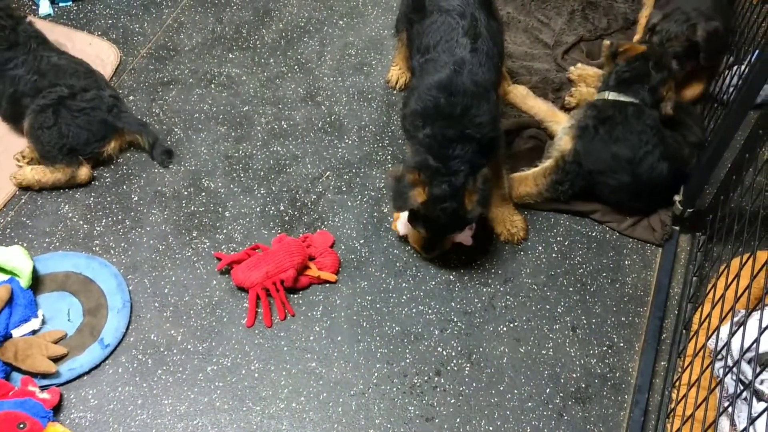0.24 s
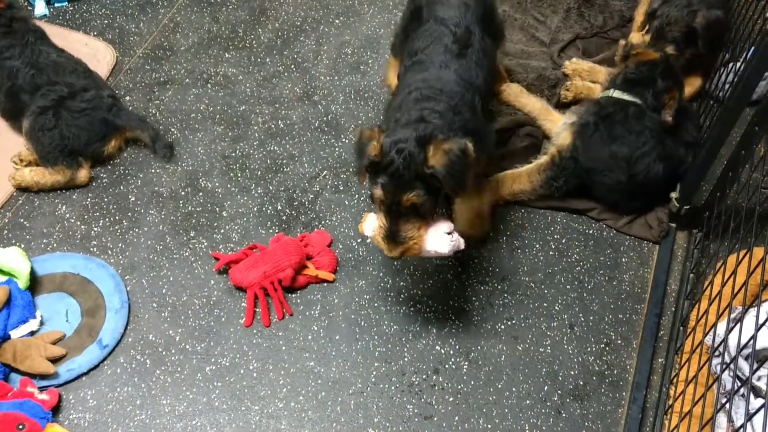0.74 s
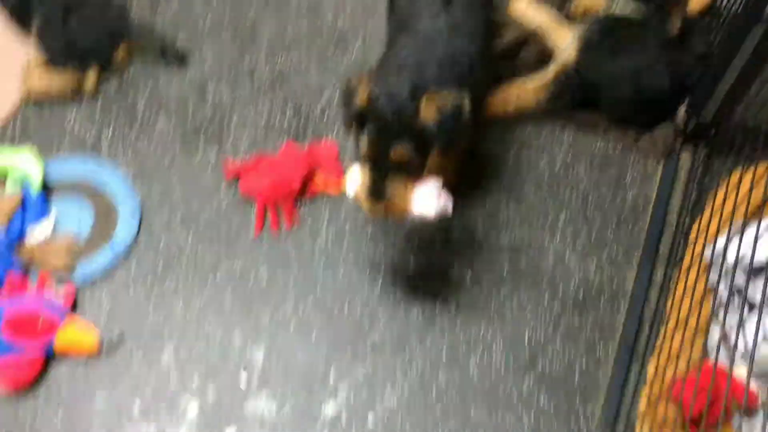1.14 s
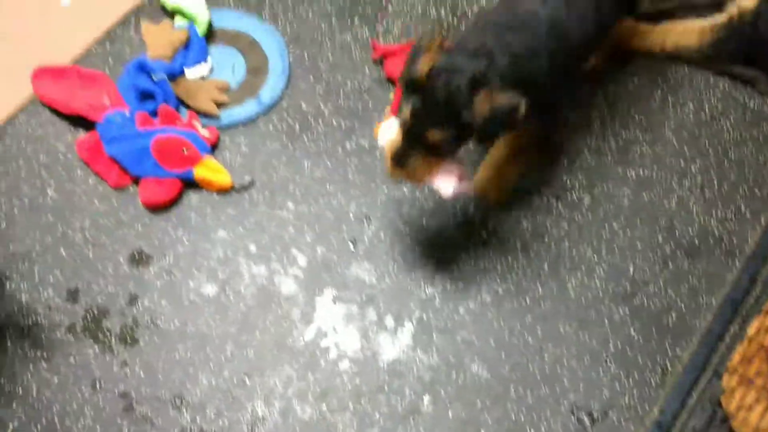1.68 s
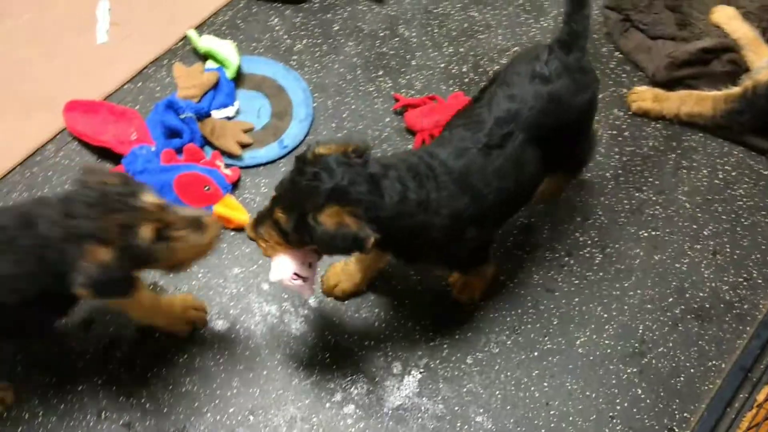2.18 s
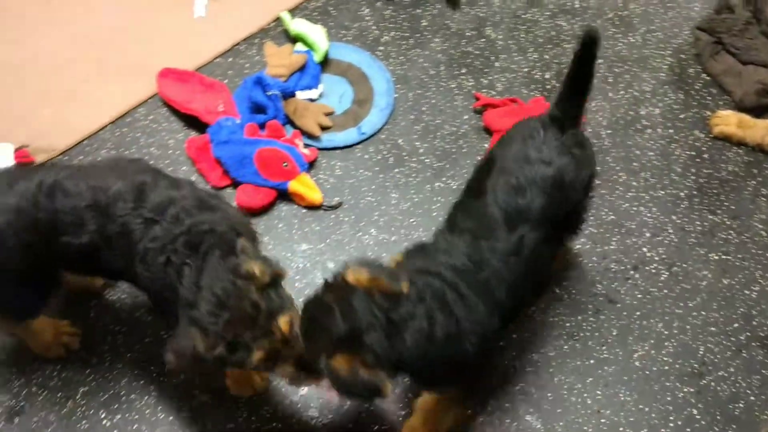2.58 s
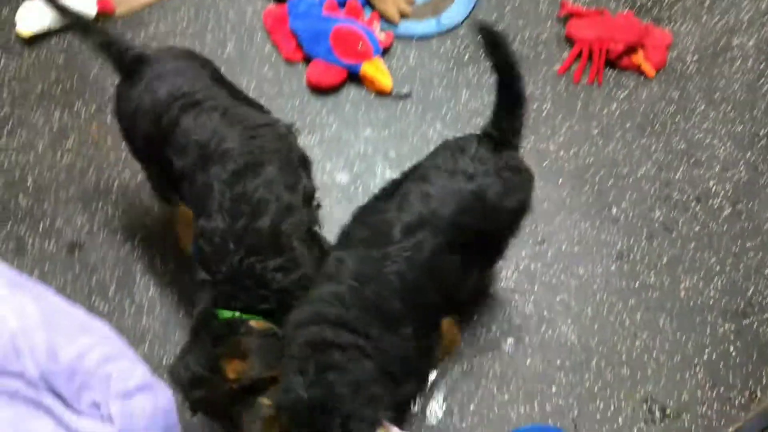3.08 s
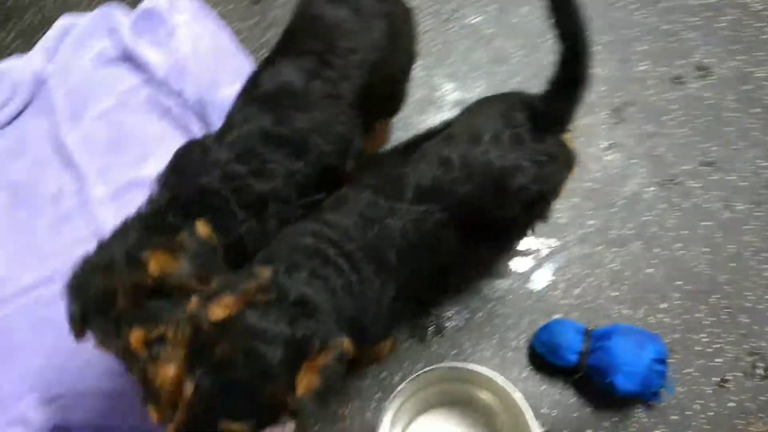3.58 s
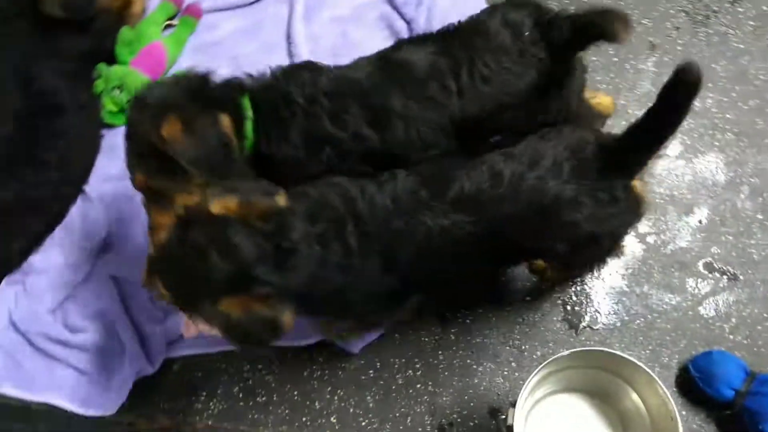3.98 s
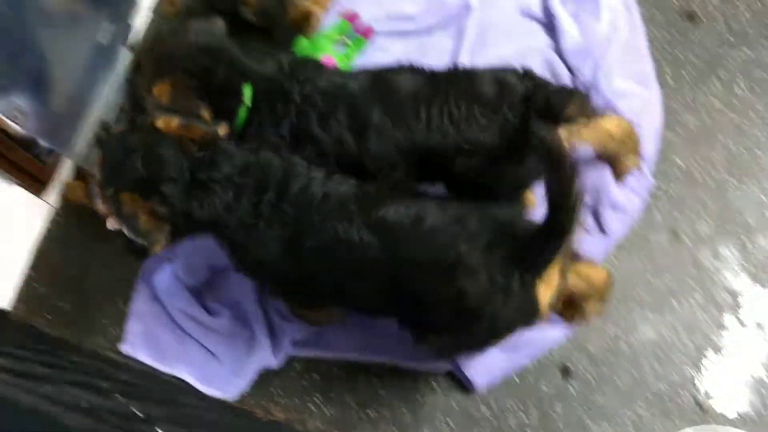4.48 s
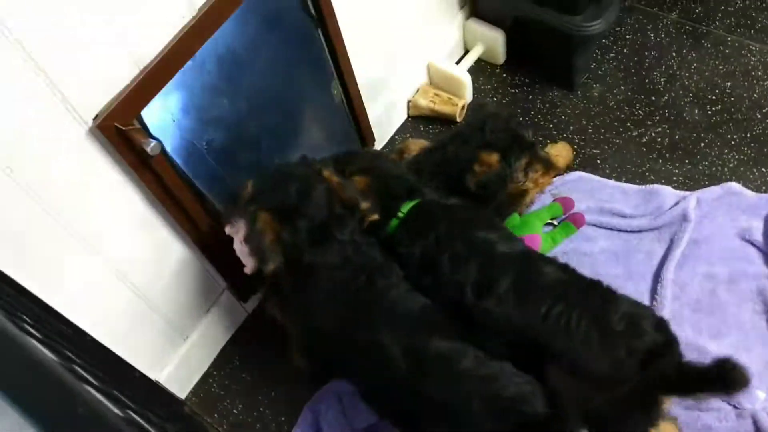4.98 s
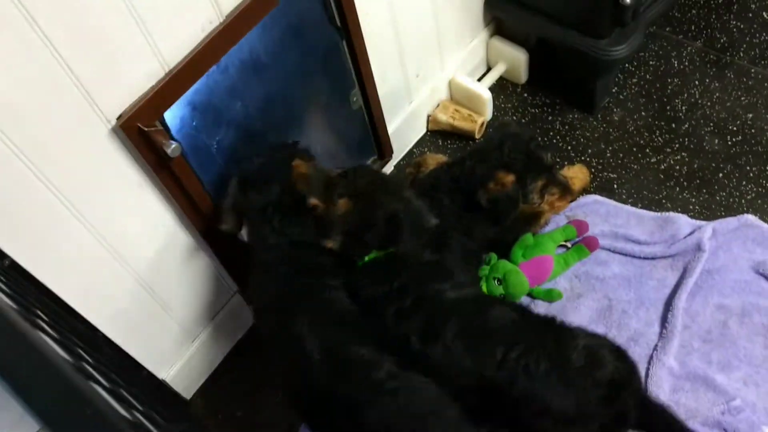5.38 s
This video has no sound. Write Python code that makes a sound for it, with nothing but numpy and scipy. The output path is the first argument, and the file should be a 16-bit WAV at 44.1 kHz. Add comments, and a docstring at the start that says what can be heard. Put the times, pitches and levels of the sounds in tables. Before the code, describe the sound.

In a small, quiet room with low ventilation hum, puppies' paws pad and slide over rubber flooring. A hard clack comes early, then scratches, claw ticks and dull knocks grow denser. Later, cloth rustles strongly as a toy is dragged over a blanket, and a bright cluster of clacks sounds near the end. Close, wide stereo handheld microphone; no barking or voices.

```python
"""In a small room with a rubber-covered floor, two puppies tussle over a soft toy, then drag it to a blanket by a door.
Pads thump as damped modes; toes, jaws and claws excite short resonances with bursts of noise.
Sliding paws and tugged cloth are trains of tiny friction slips; hard contacts clack, and decaying tones follow.
Ventilation, mains hum and rumble lie beneath, and a camera's widened microphone pair hears it all."""
import sys
import numpy as np
from scipy import signal
from scipy.fft import rfft, irfft, next_fast_len
from scipy.io import wavfile
from scipy.ndimage import uniform_filter1d, map_coordinates

SR = 44100
rng = np.random.default_rng(int(sys.argv[2]) if len(sys.argv) > 2 else 0)


def transcribe(u):
    """Save the signal u as a 16-bit wav file named by the first command-line argument.

    u: samples, shape (n,) or (channels, n), limited to [-1, 1]; the rate is SR.
    q: integer samples, one column per channel.
    """
    v = np.clip(np.atleast_2d(u).T, -1, 1)
    q = np.round(v * 32767).astype(np.int16)
    wavfile.write(sys.argv[1], SR, q)


N = 248724
BLOW_TIME = np.arange(SR // 3) / SR  # time axis of one blow, s

# Lasting tones in the room after the first clack: mode_hz, level_db, t60_s
FIRST_CLACK_RING = [(1207, -5, 0.13), (2870, 1, 0.25), (3060, -6, .17), (3360, -6, 0.14), (3833, -11, 0.14),
                    (4942, -2, .19), (5400, 0, .2), (5739, -1, .13)]
# Lasting tones in the room after the last clacks: mode_hz, level_db, t60_s
LAST_CLACK_RING = [(695, -3.5, 0.18), (779, 1, 0.21), (1345, -16, .15), (2708, -6.5, 0.25),
                   (3461, -5, 0.091), (3880, -8, .14)]


def amp(db):
    """Decibel law: a level in dB becomes an amplitude gain."""
    return 10 ** (np.asarray(db) / 20)


def unit(x):
    """Energy normalisation: scale to rms 1."""
    return x / np.sqrt(np.mean(x ** 2) + 1e-20)


def along(points, hz):
    """Logarithmic frequency scale: interpolate (Hz, value) points along it."""
    f, v = np.transpose(points)
    return np.interp(np.log(hz + 1), np.log(f), v)


def curves(rows):
    """Linear interpolation: one value per sample for each column after the time."""
    s, *cols = np.transpose(rows)
    return [np.interp(np.arange(N) / SR, s, c) for c in cols]


def wobble(rate):
    """Band-limited fluctuation: a smooth curve through random knots, rate of them a second."""
    knots = rng.standard_normal(int(N * rate / SR) + 4)
    return map_coordinates(knots, [np.arange(N) * rate / SR])


def filtered(x, response):
    """Linear filtering: multiply the spectrum by a response that is a function of frequency."""
    n = x.shape[-1]
    m = next_fast_len(n + SR // 8)  # zero padding leaves space for the filter's tail
    return irfft(rfft(x, m) * response(np.fft.rfftfreq(m, 1 / SR)), m)[..., :n]


def coloured(x, spectrum):
    """Spectral shaping: x weighted by a (Hz, dB) spectrum, at rms 1."""
    return unit(filtered(x, lambda hz: amp(along(spectrum, hz))))


def resonance(f, hz, width):
    """Damped oscillator: response of one mode with centre and width in Hz, 1 at its peak."""
    return 1j * f * width / (hz * hz - f * f + 1j * f * width)


def diffuse(pair):
    """Diffuse field: microphone correlation is strongest near 550 Hz and dips below zero near 1.1 kHz."""
    # Likeness of room sound at the two microphones: frequency_hz, correlation
    likeness = [(60, .5), (150, .3), (300, .45), (550, .6), (1100, -.2), (2200, -.05), (5000, .1)]

    def mid_side_gains(hz):
        correlation = np.clip(along(likeness, hz), -1, 1)
        return np.sqrt(1 + np.outer([1, -1], correlation))

    mid, side = filtered(pair, mid_side_gains)
    return np.array([mid + side, mid - side])


def room_noise(spectrum):
    """Diffuse field: shaped stereo noise of rms 1, arriving from all around."""
    return coloured(diffuse(rng.standard_normal((2, N))), spectrum)


def at_microphones(x, lag=1.4, spread=0.79):
    """Time difference of arrival: each source leads at the left by its own few samples, or seldom trails."""
    lead = lag + spread * rng.standard_normal()
    return filtered(x, lambda f: np.exp(1j * np.pi * np.outer([lead, -lead], f) / SR))


def in_room(x, wet_db, gap=0.0038):
    """Reverberation: direct sound, then after a gap in s a tail that decays at a different rate in each band."""
    # Reverberation time of the room: frequency_hz, t60_s
    room_decay = [(100, 0.52), (300, 0.21), (1000, 0.29), (3000, 0.3), (7000, 0.17), (15000, 0.2)]
    hz, t, z = signal.stft(rng.standard_normal((2, len(BLOW_TIME))), SR, nperseg=256)
    decay = amp(-60 * t / along(room_decay, hz)[:, None])
    tail = signal.istft(z * decay, SR, nperseg=256)[1][:, :len(BLOW_TIME)]
    tail = diffuse(tail) * np.clip(BLOW_TIME / gap - 1, 0, 1)
    answer = signal.fftconvolve(x[None], tail, axes=1)[:, :len(x)]
    wet = unit(answer) * np.std(x)
    return at_microphones(x) + amp(wet_db) * wet


def burst(t60):
    """Impact excitation: white noise that decays by 60 dB in t60 seconds."""
    return rng.standard_normal(len(BLOW_TIME)) * amp(-60 * BLOW_TIME / t60)


def add(track, s, db, blow, wet_db):
    """Superposition: add one blow at time s, its direct sound's loudest 4 ms at db, with its room answer."""
    peak = np.sqrt(uniform_filter1d(blow ** 2, size=176).max())
    part = track[:, round(s * SR):][:, :len(BLOW_TIME)]
    part += amp(db) * in_room(blow / peak, wet_db)[:, :part.shape[1]]


def background(air_db=-58, rumble_db=-65, hum_db=-68, hum_hz=60):
    """Stationary noise: steady ventilation, with mains hum and low rumble whose levels drift slowly."""
    # Spectrum of the ventilation: frequency_hz, level_db
    air_spectrum = [(25, -29), (45, 4), (75, 3), (130, -0.5), (300, 2.5), (600, -8), (1500, -14.5),
                    (2400, -13.5), (3600, -23), (5500, -23), (10000, -36), (15500, -26)]
    # Spectrum of the low rumble: frequency_hz, level_db
    rumble_spectrum = [(20, -31), (40, -15), (60, -9), (90, -3), (140, -6), (300, -26), (1000, -70)]
    air = amp(air_db) * room_noise(air_spectrum)
    hum_tone = unit(np.sin(2 * np.pi * hum_hz * np.arange(N) / SR))
    hum = amp(hum_db + wobble(1.07)) * hum_tone
    rumble = amp(rumble_db + wobble(1.9)) * room_noise(rumble_spectrum)
    return air + hum + rumble


def stroke(start, length, attack, release_db_per_s):
    """Friction grows with speed: the gain rises, holds until length (s) has passed and dies away."""
    t = np.arange(N) / SR - start
    rise = np.sin(np.pi / 2 * np.clip(t / attack, 0, 1))
    return rise * amp(-release_db_per_s * np.maximum(t - length, 0))


def friction(spectrum, density, jerk_db, wet_db):
    """Stick-slip: random tiny slips, density a second, with their room wash, fluctuating in jerks; rms 1."""
    slips = (rng.random(N) < density / SR) * rng.standard_normal(N)
    direct = at_microphones(coloured(slips, spectrum))
    wash = amp(wet_db) * room_noise(spectrum)
    return unit((direct + wash) * amp(jerk_db * wobble(70)))


def scuffle(rest_shuffle_db=-61, rest_scratch_db=-70, rest_cloth_db=-69):
    """Sliding friction: pads shuffle, claws scratch and cloth rustles; stroke powers add over a restless floor."""
    # Paws sliding over the rubber: start_s, push_length_s, shuffle_db, scratch_db
    slide_strokes = [(.01, 0.037, -56, -84), (0.181, 0.12, -56.5, -74), (0.617, 0.15, -59, -60.5),
                     (0.772, 0.15, -54, -70), (1.344, 0.032, -50, -47.5), (1.533, .04, -61, -57),
                     (1.642, 0.093, -47.5, -73), (1.789, 0.074, -54.5, -55.5), (1.859, 0.098, -47, -45.5),
                     (2.058, .04, -60, -56.5), (2.291, 0.053, -48.5, -46), (2.415, 0.048, -47, -53.5),
                     (2.555, 0.037, -52.5, -51.5), (2.666, 0.098, -58, -79), (2.812, 0.064, -56.5, -49),
                     (2.878, 0.047, -47, -53.5), (3.076, 0.032, -55.5, -69), (3.261, .05, -46.5, -58),
                     (3.336, 0.062, -51.5, -64), (3.607, 0.026, -56, -64), (3.759, 0.042, -50.5, -51),
                     (4.2, 0.073, -62.5, -78), (4.899, 0.025, -49.5, -58), (5.527, 0.031, -55, -67)]
    # Toy and blanket being tugged: start_s, pull_length_s, rustle_db
    tug_strokes = [(0.778, 0.075, -61.5), (2.284, 0.058, -51), (2.81, 0.03, -64), (3.25, .16, -58),
                   (3.55, .03, -63.5), (3.708, 0.12, -49.5), (4.054, 0.098, -52.5), (4.357, 0.045, -51.5),
                   (4.557, 0.056, -41.5), (4.648, 0.11, -40.5), (4.837, 0.049, -47.5), (5.048, 0.067, -48),
                   (5.098, .19, -50), (5.38, 0.1, -60), (5.548, 0.12, -50.5)]
    # Restlessness between the strokes: time_s, level_db
    restlessness = [(0, -4), (1.15, -1), (1.6, 1.5), (2.5, 5), (3.3, 2.5), (4, 2.5), (4.5, -6.5),
                    (5.64, 1.5)]
    # Spectrum of pads on rubber: frequency_hz, level_db
    shuffle_spectrum = [(60, -72), (150, -2.5), (280, 6), (520, 4.5), (900, 4), (1500, -2.5), (2200, -12),
                        (4000, -17), (16000, -42)]
    # Spectrum of claws on rubber: frequency_hz, level_db
    scratch_spectrum = [(600, -48), (1800, 3), (2900, 0.5), (3800, -2), (4800, -14.5), (7500, -14),
                        (10000, -20), (16000, -38)]
    # Spectrum of fur and blanket: frequency_hz, level_db
    cloth_spectrum = [(200, -48), (1000, 4), (2200, 7.5), (4000, 1.5), (6000, 3), (9000, -1), (12000, -0.5),
                      (15500, -1.5)]
    slide_attack_s, slide_release_db_per_s = 0.032, 181
    tug_rise_share, tug_release_db_per_s = 0.8, 156  # a pull gathers speed over this share of its length
    drag_db = -5  # shuffle of the bodies that a tug drags along, against its rustle

    fidget = amp(curves(restlessness)[0] + 0.94 * wobble(9.8))
    tug_power = 0
    for s, length, db in tug_strokes:
        gain = stroke(s, length, tug_rise_share * length, tug_release_db_per_s)
        tug_power = tug_power + (amp(db) * gain) ** 2
    pad_power = amp(drag_db) ** 2 * tug_power
    claw_power = 0
    for s, length, pad_db, claw_db in slide_strokes:
        gain = stroke(s, length, slide_attack_s, slide_release_db_per_s)
        pad_power = pad_power + (amp(pad_db) * gain) ** 2
        claw_power = claw_power + (amp(claw_db) * gain) ** 2

    def level(power, rest_db):
        return np.sqrt(power + (amp(rest_db) * fidget) ** 2)

    shuffle = friction(shuffle_spectrum, density=420, jerk_db=1.5, wet_db=4.5)
    scratch = friction(scratch_spectrum, density=400, jerk_db=2.4, wet_db=3.5)
    cloth = friction(cloth_spectrum, density=1200, jerk_db=1.1, wet_db=9)
    pads = level(pad_power, rest_shuffle_db) * shuffle
    nails = level(claw_power, rest_scratch_db) * scratch
    return pads + nails + level(tug_power, rest_cloth_db) * cloth


def after_ring(waver_rad=0.83, wet_db=-2):
    """Free decay: tones die away after two of the clacks, blurred by a steady random phase waver."""
    # Start and level of each set of tones: start_s, level_db, modes
    lasting_tones = [(1.233, -42.5, FIRST_CLACK_RING), (5.308, -40.5, LAST_CLACK_RING)]
    track = np.zeros((2, N))
    for s, db, modes in lasting_tones:
        ring = np.zeros(len(BLOW_TIME))
        for hz, level, t60 in modes:
            waver = waver_rad * wobble(120)[:len(BLOW_TIME)]
            ring += amp(level - 60 * BLOW_TIME / t60) * np.sin(2 * np.pi * hz * BLOW_TIME + waver)
        add(track, s, db, ring, wet_db)
    return track


def clacks():
    """Forced resonance: milliseconds of hard chatter drive low, middle and high modes by separate amounts."""
    # Something hard being bumped: start_s, body_db, ring_db, edge_db, room_share_db
    hard_contacts = [(1.2323, -36.5, -30, -42, -1), (1.2355, -41, -37, -44, 2.5),
                     (1.3613, -47, -43, -52, -0.5), (5.3001, -41, -26, -33, -6),
                     (5.3056, -35, -28.5, -25, -7), (5.309, -31.5, -29.5, -31, -6)]
    # Resonances of the hard object: mode_hz, width_hz, level_db
    hard_modes = [(800, 650, 4.5), (1220, 170, -41), (1710, 650, 3), (2360, 390, 8.5), (3980, 360, 8.5),
                  (5500, 1660, 6.5), (7400, 3100, -7), (8600, 2200, 10), (11500, 1300, -7),
                  (14000, 11000, 14)]
    # Registers named body, ring and edge: from_hz, to_hz
    registers = [(0, 2200), (2200, 8000), (8000, 20000)]
    track = np.zeros((2, N))
    for s, *levels, wet_db in hard_contacts:
        for (lo, hi), db in zip(registers, levels):
            modes = [mode for mode in hard_modes if lo <= mode[0] < hi]

            def response(f):
                # neighbouring modes have opposite signs
                return sum((-1) ** k * amp(level) * resonance(f, hz, width)
                           for k, (hz, width, level) in enumerate(modes))

            chatter = burst(.026)
            add(track, s, db, filtered(chatter, response), wet_db)
    return track


def claws(level_db=-7, width_hz=1700, snap_db=-4, wet_db=-2):
    """Impulse response: a tiny crack excites a claw's resonance, and a very broad one adds a bright snap."""
    # Claw ticks, before the layer's level and snap gains: start_s, level_db, tick_hz, brightness_db
    claw_ticks = [(0.3229, -36, 3630, -42), (0.4228, -46, 2980, 3), (.634, -45, 2470, -28),
                  (0.787, -42.5, 3030, -34), (1.554, -53, 3370, -20), (1.877, -42, 2800, -12),
                  (2.0835, -41.5, 3160, -34), (2.148, -46, 2800, 12), (2.251, -35.5, 3170, 10),
                  (2.3185, -43, 3140, -24), (2.3636, -40, 4030, -31), (2.4365, -35, 4270, -19),
                  (2.8422, -37.5, 3060, -28), (2.889, -30.5, 3300, -5), (2.8955, -24.5, 3070, -22)]
    track = np.zeros((2, N))
    for s, db, hz, bright_db in claw_ticks:

        def response(f):
            snap = amp(bright_db + snap_db) * resonance(f, 5900, 17000)
            return resonance(f, hz, width_hz) ** 2 + snap

        crack = burst(.014)
        add(track, s, db + level_db, filtered(crack, response), wet_db)
    return track


def knocks(level_db=-4.5, grit_db=-5, wet_db=-3):
    """Heavy damping: a knock of toes or jaws is a few cycles of one resonance, with a little contact grit."""
    # Dull knocks of toes and jaws, before the layer's gain: start_s, level_db, knock_hz
    dull_knocks = [(.107, -45.5, 544), (.424, -48, 786), (.702, -43, 860), (.786, -41.5, 820),
                   (.801, -41, 855), (.9, -38.5, 650), (1.522, -44.5, 805), (1.553, -44, 880),
                   (1.598, -46.5, 850), (1.661, -45, 706), (1.729, -37, 750), (2.251, -33, 1260),
                   (2.256, -31, 867), (2.433, -37.5, 1120), (2.784, -42.5, 970), (2.888, -26.5, 1440),
                   (2.896, -32, 1210), (3.106, -48, 1010), (3.27, -37, 690), (3.303, -40, 533),
                   (3.498, -43.5, 526), (3.623, -42, 644), (3.66, -44, 723), (5.041, -48, 630),
                   (5.552, -39, 750)]
    knock_t60_s = 0.026
    track = np.zeros((2, N))
    for s, db, hz in dull_knocks:
        ring = np.sin(2 * np.pi * hz * BLOW_TIME) * amp(-60 * BLOW_TIME / knock_t60_s)
        crack = burst(.02)
        grit = filtered(crack, lambda f: resonance(f, 1180, 1250) ** 2)
        add(track, s, db + level_db, unit(ring) + amp(grit_db) * unit(grit), wet_db)
    return track


def paws(level_db=-2, slap_db=-3, attack=0.0028, wet_db=-3):
    """Modal impact: a soft pad excites a few low damped modes of paw and floor, with a broad padded slap."""
    # Soft paw falls, before the layer's gain: start_s, level_db, thump_hz
    paw_falls = [(.334, -43.5, 148), (0.447, -41.5, 244), (.626, -38.5, 91), (.702, -33, 317),
                 (.72, -37, 305), (.857, -43, 167), (.901, -34, 195.4), (1.241, -40.5, 356),
                 (1.361, -39, 269.6), (1.384, -40.5, 262), (1.535, -46.5, 200), (1.66, -42.5, 305),
                 (1.735, -36.5, 302), (1.796, -41.5, 223), (1.927, -39.5, 323), (2.166, -39.5, 223.4),
                 (2.313, -37, 243), (2.433, -47.5, 215), (2.506, -32, 327), (2.779, -42.5, 386),
                 (2.888, -38, 246), (2.973, -44.5, 214), (3.067, -41, 244), (3.099, -43, 285),
                 (3.271, -38, 277), (3.299, -42, 320), (3.495, -37, 210), (3.708, -35, 236),
                 (3.785, -42, 293), (3.826, -36, 205), (3.893, -36.5, 348.6), (4.76, -40, 305),
                 (4.852, -38, 294), (5.033, -41, 250), (5.103, -39, 232), (5.236, -39, 318),
                 (5.528, -40.5, 268.6)]
    # Modes of paw and floor: multiple_of_thump_hz, level_db
    thud_modes = [(.62, -21.5), (0.998, -0.5), (1.402, -9)]
    thump_t60_s = 0.075  # the floor damps every paw fall alike
    track = np.zeros((2, N))
    for s, db, hz in paw_falls:
        modes = np.zeros(len(BLOW_TIME))
        for ratio, level in thud_modes:
            # each fall excites the modes a little differently
            modes += amp(level + rng.normal(0, 2.1)) * np.sin(2 * np.pi * hz * ratio * BLOW_TIME)
        soft_onset = 1 - np.exp(-BLOW_TIME / attack)
        thump = modes * amp(-60 * BLOW_TIME / thump_t60_s) * soft_onset
        slap = filtered(burst(0.12), lambda f: resonance(f, 240.5, 334) ** 3)
        add(track, s, db + level_db, unit(thump) + amp(slap_db) * unit(slap), wet_db)
    return track


def scene():
    """Superposition: the puppies' play adds to the quiet of the room."""
    friction_and_air = background() + scuffle()
    impacts = after_ring() + clacks() + claws() + knocks() + paws()
    return friction_and_air + impacts


def record(dry):
    """Stereo widening: subtract the delayed other side, tilt the balance, cut deep bass and top, offset the inputs."""
    # Stereo widening: frequency_hz, share_of_other_side
    crossfeed = [(300, 0.089), (900, 0.68), (2000, 0.99), (7000, 0.63), (15000, 0.48)]
    # Balance of the two sides: frequency_hz, left_minus_right_db
    lean = [(60, 8), (130, 3), (200, 1.6), (500, 1), (2000, -.3), (5000, -1.8), (12000, -4)]
    # Constant offset of the left and right inputs: offset (full scale 1)
    dc_offset = [
        [.0072],
        [0],
    ]
    widen_delay_samples, low_cut_hz, top_hz = 20, 48, 15600

    def share(hz):
        return np.clip(along(crossfeed, hz), 0, 1)

    def delayed_share(hz):
        return share(hz) * np.exp(-2j * np.pi * hz * widen_delay_samples / SR)

    def balance(hz):
        # the divisor undoes the power that widening adds to unrelated sides
        return amp(np.outer([.5, -.5], along(lean, hz))) / np.hypot(1, share(hz))

    wide = dry - filtered(dry[::-1], delayed_share)
    balanced = filtered(wide, balance)
    low_cut = signal.butter(4, low_cut_hz, "high", fs=SR, output="sos")
    thinned = signal.sosfilt(low_cut, balanced)
    return filtered(thinned, lambda hz: hz < top_hz) + dc_offset


dry = scene()
out = record(dry)
transcribe(out)
```